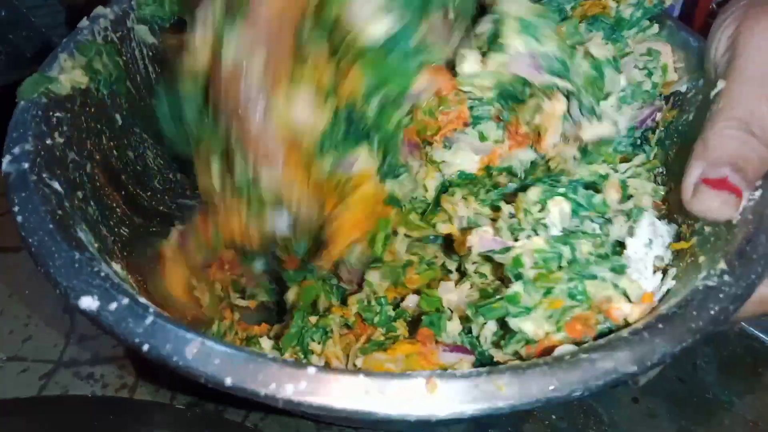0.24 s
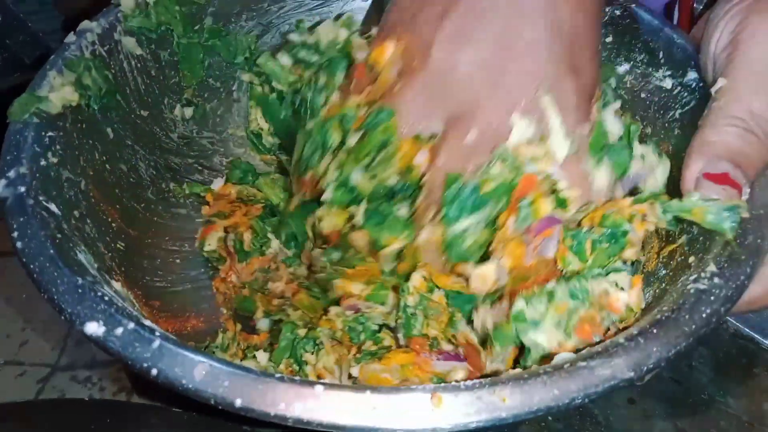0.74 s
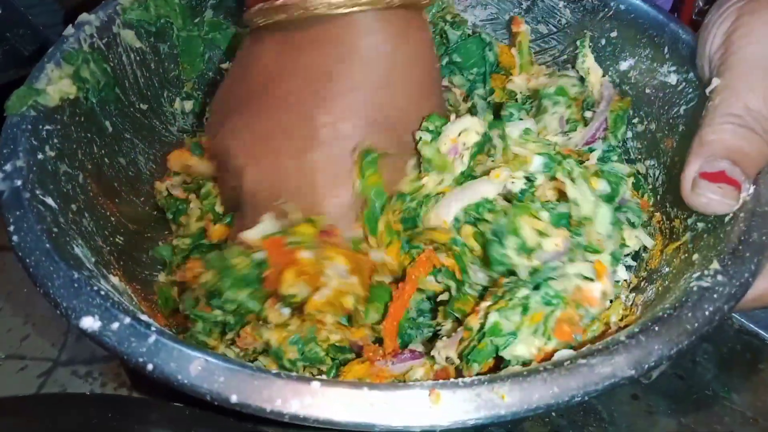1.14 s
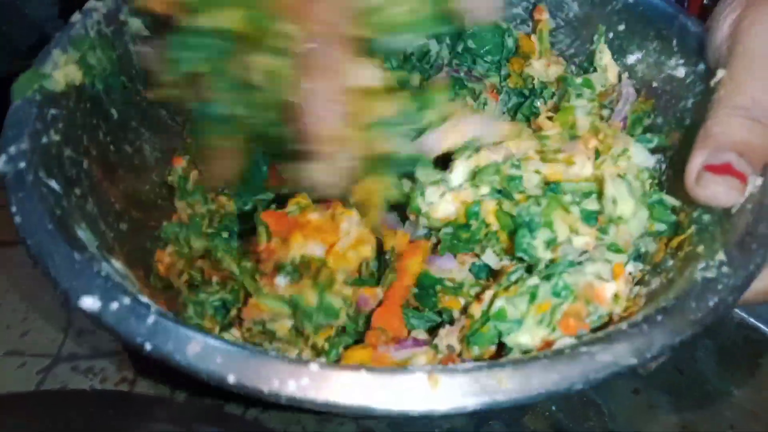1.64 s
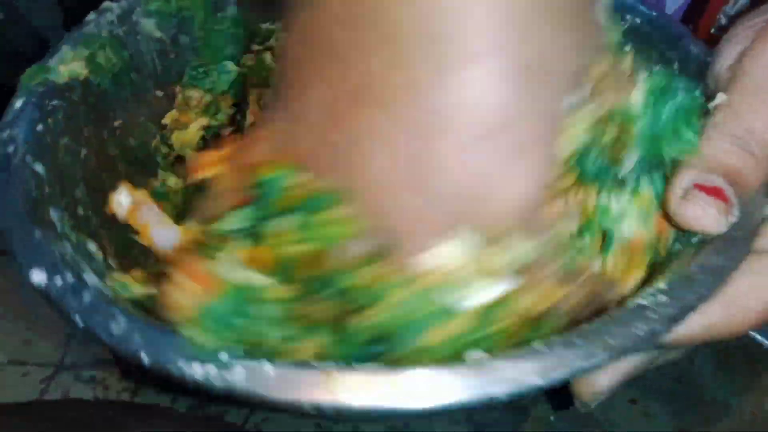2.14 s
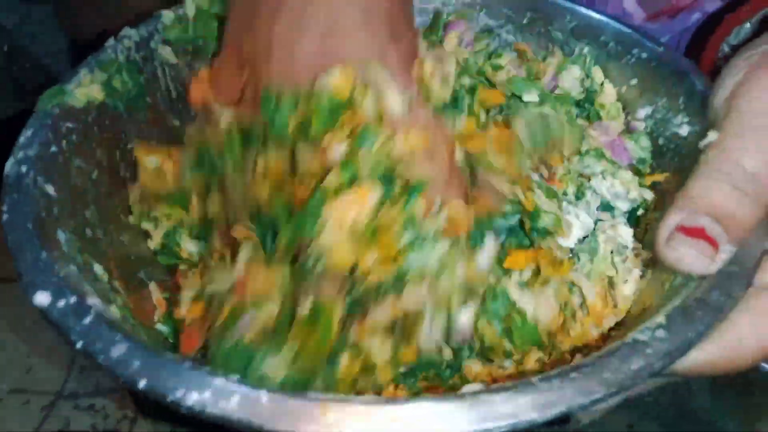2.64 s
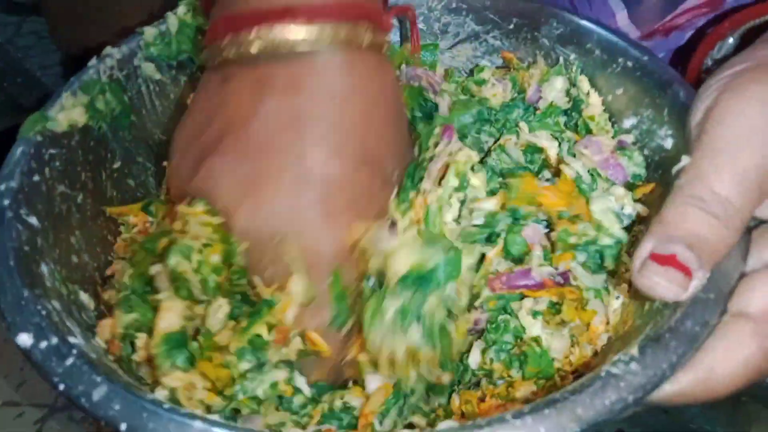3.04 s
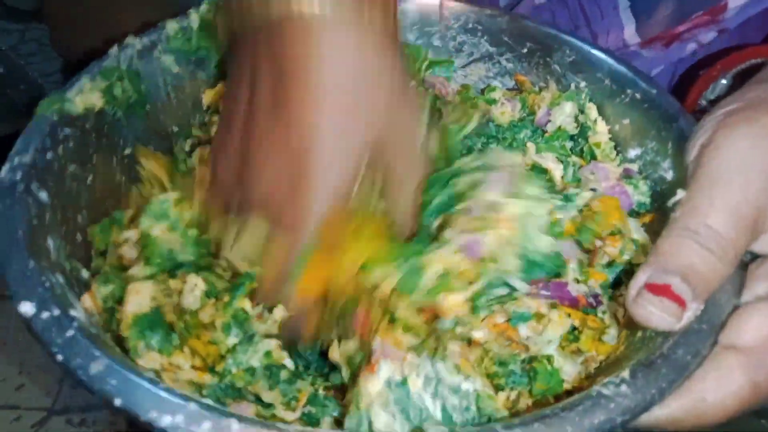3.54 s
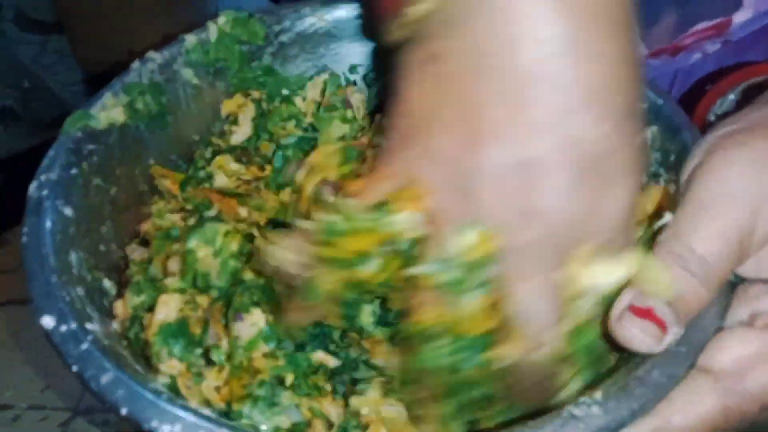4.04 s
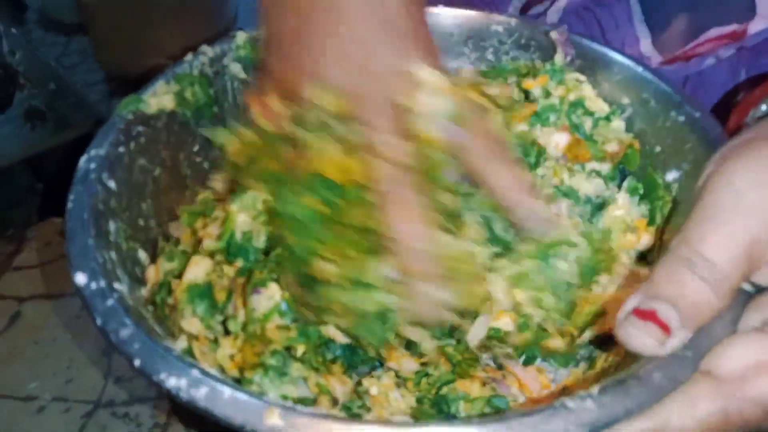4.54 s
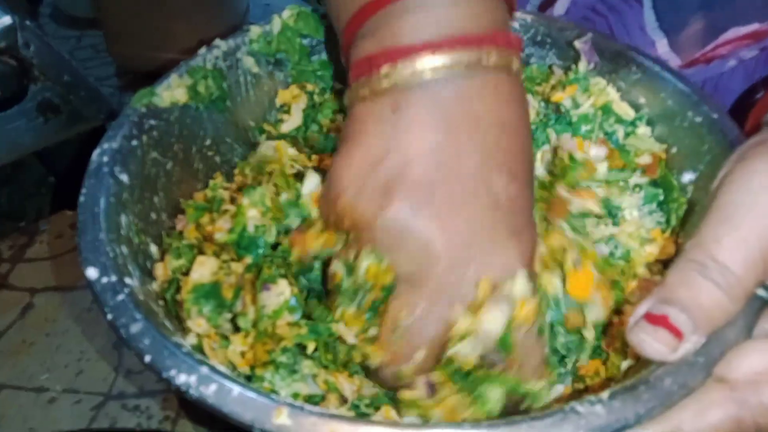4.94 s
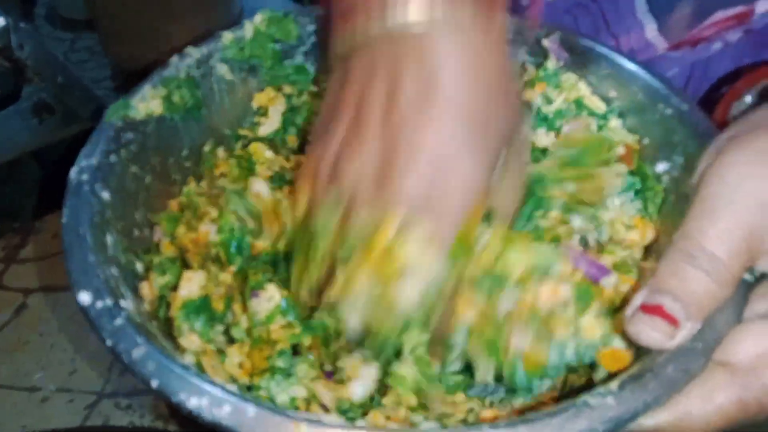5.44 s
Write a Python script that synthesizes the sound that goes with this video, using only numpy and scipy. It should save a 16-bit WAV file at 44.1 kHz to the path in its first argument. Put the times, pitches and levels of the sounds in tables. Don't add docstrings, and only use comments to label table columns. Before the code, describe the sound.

A hand squelches and crunches through a stiff, wet chopped mixture in a steel bowl that knocks dully on a stone floor.

```python
import sys
import numpy as np
from scipy import signal
from scipy.fft import rfft, irfft
from scipy.io import wavfile
from scipy.ndimage import uniform_filter1d, minimum_filter1d

SR = 44100
rng = np.random.default_rng(int(sys.argv[2]) if len(sys.argv) > 2 else 0)


def store_pcm(level_fs):
    pcm = np.round(np.clip(level_fs, -1, 1) * 32767).astype(np.int16)
    wavfile.write(sys.argv[1], SR, np.atleast_2d(pcm).T)


def invert_db(x):
    u = np.asarray(x, float) / 20
    return 10 ** u


N = 250929
TIME = np.arange(N) / SR

# (frequency [Hz], level [dB], t60 [s])
BOWL_MODES = [(549, -27, 0.009), (660, -4.5, 0.006), (731, -13.5, 0.066), (920, 1, 0.0098),
              (1190, 6, 0.041), (1252, -1, 0.056), (1500, 11.5, 0.023), (1630, 15, 0.014),
              (1910, 0, 0.0053), (2134, 10.5, 0.022), (2460, -24, 0.011), (2742, -16, 0.017)]
# (frequency [Hz], level per Hz [dB])
SQUELCH_COLOUR = [(88, -54), (150, -16.5), (468, -15), (804, 4.5), (968, -0.5), (1550, -4), (2000, -6.5),
                  (2440, -5.5), (3740, -7.5), (4500, -24), (5850, -57), (9900, -120)]
# (frequency [Hz], level per Hz [dB])
CRACKLE_COLOUR = [(3000, 9), (4000, 1.5), (4500, -7.5), (5600, -6.5), (6800, -1), (7500, 0.5), (8150, 4),
                  (8700, -1.5), (9400, -3.5), (9700, -11), (11500, -11.5), (11900, -15), (13000, -23),
                  (13400, -20), (14800, -13.5), (15600, -15.5)]
BAND_EDGES_HZ = [250, 1100, 3800, 9500, 16400]


def rms_one(x):
    return x / np.sqrt(np.mean(x ** 2) + 1e-20)


def peak_one(x):
    return x / np.max(np.abs(x))


def at_hz(points, hz):
    curve = np.array(points)
    return np.interp(np.log(np.maximum(hz, 1)), np.log(curve[:, 0]), curve[:, 1])


def colour(x, spectrum):
    size = 2 ** 11
    level_db = at_hz(spectrum, np.linspace(0, SR / 2, size // 2 + 1))
    cepstrum = irfft(np.log(invert_db(level_db)))
    cepstrum[1:size // 2] *= 2
    cepstrum[size // 2 + 1:] = 0
    return signal.oaconvolve(x, irfft(np.exp(rfft(cepstrum))))[:len(x)]


def band(x, low_hz, high_hz):
    return signal.sosfilt(signal.butter(2, [low_hz, high_hz], "band", fs=SR, output="sos"), x + 1e-18)


def drift(rate):
    r = np.exp(-80 * np.pi * rate / SR)
    slow = signal.lfilter([1], [1, -2 * r, r * r], rng.standard_normal(N // 40 + 2002))[2000:]
    return np.interp(np.arange(N) / 40, np.arange(len(slow)), rms_one(slow))


def add(out, s, piece):
    at = max(round(s * SR), 0)
    out[at:at + len(piece)] += piece[:len(out) - at]


def swells(s, db, width):
    coarse = TIME[::64]
    bells = np.exp(-((coarse - s[:, None]) / width[:, None]) ** 2)
    return np.interp(TIME, coarse, np.sum(invert_db(db)[:, None] * bells, axis=0))


def patchy(x, low_hz, high_hz, patch_db):
    edges = np.geomspace(low_hz, high_hz, 4)
    out = 0
    for k, (low, high) in enumerate(zip(edges, edges[1:])):
        out = out + invert_db(patch_db * drift(9)) * band(x, low, high) * (-1) ** k
    return out


def hand():
    # (time [s], pressure as wet smack [dB], crispness of what it crushes [dB])
    presses = [(0, -39.5, -13), (.33, -67.5, -1.5), (.54, -66.5, -0.5), (.65, -52, -14.5),
               (1.1, -43, -11.5), (1.3, -55, -3), (1.58, -56, -7.5), (1.76, -66.5, -4), (2.0, -57, -1),
               (2.55, -61.5, -3), (2.97, -43, -9.5), (3.3, -49, -4.5), (3.62, -53, -19), (3.9, -60.5, -7),
               (4.6, -64, -5.5), (4.9, -42.5, -4), (5.2, -46.5, -7.5), (5.69, -62, -5.5)]
    # (middle [s], smack [dB], width [s], hollow
    # part [dB])
    squelches = [(.17, -56, 0.07, -4), (.82, -78, 0.01, 28), (5.096, -48.5, 0.034, -4),
                 (.43, -73.5, 0.091, 15), (.67, -47.5, 0.033, 6), (.96, -42, 0.033, -14),
                 (1.53, -48.5, .06, -16), (5.46, -50, 0.047, -22), (1.37, -70.5, 0.036, 23.5),
                 (1.884, -46.5, 0.066, 4), (2.193, -50, 0.14, -1.5), (2.437, -49.5, 0.04, -3),
                 (2.72, -83, 0.15, 19), (4.088, -53, 0.086, 0), (4.366, -50.5, 0.038, -6),
                 (4.78, -67.5, 0.15, 15.5), (5.31, -48, 0.012, -2), (5.48, -62, 0.029, -15)]
    # (middle [s], level [dB], width [s])
    drags = [
        (.5, -76, 0.3),
        (1.86, -58.5, 0.088),
        (2.8, -62.5, 0.14),
        (4.6, -72, 0.12),
        (5.69, -71.5, 0.35),
    ]
    s, *columns = np.transpose(presses)
    press_db, crisp_db = (np.interp(TIME, s, column) for column in columns)
    s, db, width, hollow_db = np.transpose(squelches)
    hollow = invert_db(-55.5 + 0.76 * (press_db + 51.5)) + swells(s, db + hollow_db, width)
    smack = invert_db(press_db) + swells(s, db, width)
    crackle = invert_db(press_db + crisp_db)
    fizz = invert_db(-65.5 + 0.78 * (press_db + crisp_db + 60.5))
    drag = invert_db(-72.5 + 0.13 * (press_db + 48)) + swells(*np.transpose(drags))
    return hollow, smack, crackle, fizz, drag


def ring_bowl(x):
    out = 0
    for hz, db, t60 in BOWL_MODES:
        r, w = invert_db(-60 / (t60 * SR)), 2 * np.pi * hz / SR
        out = out + signal.lfilter([0, invert_db(db) * np.sin(w)], [1, -2 * r * np.cos(w), r * r], x)
    return out


def mixture():
    out, clumps = np.zeros(N), drift(35)
    colours = (SQUELCH_COLOUR, SQUELCH_COLOUR, CRACKLE_COLOUR, CRACKLE_COLOUR)
    bursts_per_s, burst_db = (285, 607, 1100, 1500), (-2.0, -3.0, -10.0, -11.0)
    bowl_levels_db = (-5, -5, None, None)
    layers = zip(BAND_EDGES_HZ, BAND_EDGES_HZ[1:], hand(), colours, bursts_per_s, burst_db, bowl_levels_db)
    for low_hz, high_hz, gain, spectrum, per_s, grain_db, bowl_db in layers:
        born = rng.random(N) < per_s * invert_db(3 * clumps + 3 * drift(30)) / SR
        sizes = invert_db(3 * np.minimum(rng.exponential(1, N), 5))
        bursts = born * sizes * rng.choice([-1, 1], N)
        friction = rng.standard_normal(N) * invert_db(1.5 * clumps + 2.2 * drift(22.6))
        raw = invert_db(grain_db) * rms_one(bursts) + friction
        wet = rms_one(colour(raw, spectrum))
        if bowl_db is not None:
            wet = wet + invert_db(bowl_db) * rms_one(ring_bowl(raw))
        uneven = patchy(wet, low_hz, high_hz, patch_db=3.0)
        out += gain * rms_one(band(uneven, low_hz * 0.72, high_hz * 1.32))
    return out


def rumble():
    # (frequency [Hz], level per Hz [dB])
    drag_colour = [(15, -26), (25, -1.5), (195, 3.5), (240, -3), (300, 3.5), (350, -8.5), (460, -1),
                   (770, -120)]
    return hand()[-1] * invert_db(0.99 * drift(3.2)) * rms_one(colour(rng.standard_normal(N), drag_colour))


def kitchen_air():
    hiss = band(colour(rng.standard_normal(N), CRACKLE_COLOUR), 8000, 16000)
    hum = colour(rng.standard_normal(N), SQUELCH_COLOUR)
    return invert_db(-67) * rms_one(hiss) + invert_db(-69.5) * rms_one(hum)


def pops():
    # (time [s], peak [dB], pitch [Hz])
    pockets = [(0.022, -31, 1710), (0.031, -22.5, 1910), (0.066, -35, 1650), (0.247, -41, 2400),
               (0.722, -35, 2500), (0.835, -33.5, 696), (0.88, -51, 1510), (1.046, -25.5, 780),
               (1.419, -34, 856), (1.692, -40, 845), (1.93, -21.5, 1220), (2.145, -35, 1270),
               (2.157, -23.5, 1220), (2.999, -30.5, 1870), (3.031, -25.5, 1630), (3.133, -33, 1690),
               (3.153, -38, 2030), (3.228, -28, 1660), (3.244, -26, 830), (3.292, -13, 797),
               (3.374, -37, 890), (3.416, -29, 1500), (3.555, -27.5, 1450), (4.353, -31.5, 820),
               (5.125, -35, 1560), (5.215, -28, 1500), (5.274, -3.5, 847), (5.314, -22, 830)]
    out, t = np.zeros(N), np.arange(round(0.059 * SR)) / SR
    spread, t60_s = 2 ** 0.67, 0.036
    for s, db, hz in pockets:
        noise = rng.standard_normal(len(t))
        burst = rms_one(band(band(noise, hz / spread, hz * spread), hz / 2, hz * 2))
        fade = invert_db(db - 9 - 60 * t / t60_s) * (1 - np.exp(-t / 0.00031))
        add(out, s - .001, fade * burst)
    return out


def ticks():
    # (time [s], peak [dB], lower edge [dB], t60 [s])
    bangles = [(0.114, -37, 18, 0.015), (0.4104, -42.5, 6.5, 0.047), (0.508, -37, 0, 0.06),
               (0.5465, -29, -18, 0.022), (0.9064, -13, -7, 0.048), (1.009, -31.5, -1, 0.03),
               (1.1383, -43, -6, .016), (1.2105, -45, -16, .024), (1.284, -20, 2, 0.045),
               (1.4469, -24.5, 3, 0.057), (1.845, -28.5, -18, 0.05), (1.9, -51, -16, .042),
               (2.2026, -21.5, -30, 0.053), (2.7275, -27, -4, 0.087), (2.9186, -32, 4, 0.033),
               (3.115, -44, -15, 0.021), (3.195, -39, -18, .03), (3.5544, -20.5, -14, 0.022),
               (3.594, -25, 3, 0.074), (3.7743, -41.5, -21, 0.024), (4.5813, -38.5, -14, 0.041),
               (4.666, -11, -1.5, 0.023), (4.818, -20.5, -35, 0.089), (4.858, -29, 0, 0.073),
               (4.9365, -12, 0.5, 0.014), (5.0273, -30, 0, 0.056), (5.0556, -31, -12, .024),
               (5.265, -34.5, -3, 0.13), (5.4075, -18.5, 7.5, 0.05), (5.5395, -38.5, -5, 0.096)]
    # (time [s], peak [dB])
    leaf_snaps = [(0.283, -50), (0.3526, -44), (0.8729, -47), (1.0645, -45), (1.0934, -47), (1.158, -32),
                  (1.2381, -36), (1.6132, -44), (2.3491, -60), (2.4309, -47), (2.5306, -46), (2.6938, -42),
                  (2.8908, -43), (3.033, -37), (3.141, -34), (3.3493, -38), (3.497, -46), (3.5104, -45),
                  (3.5285, -43), (3.6825, -46), (3.8676, -50), (4.4645, -38.5), (4.787, -44), (4.9155, -24),
                  (5.103, -28.5), (5.2046, -41), (5.235, -40), (5.3144, -44), (5.475, -27.5), (5.5079, -37),
                  (5.5664, -36)]
    snap_edge_db, snap_t60_s = -12, 0.016
    fine_db, fine_t60_s = -10, 0.063
    out, t = np.zeros(N), np.arange(round(.1 * SR)) / SR
    for s, db, edge_db, t60 in bangles + [(s, db, snap_edge_db, snap_t60_s) for s, db in leaf_snaps]:
        crack = colour(rng.standard_normal(len(t)), CRACKLE_COLOUR)
        edge = rms_one(band(crack, 3000, 5500))
        body = rms_one(band(crack, 5600, 9500))
        fine = rms_one(band(crack, 9600, 17000))
        fade = invert_db(-60 * t / max(t60, .004)) * (1 - np.exp(-t / 0.00045))
        shares = invert_db(edge_db) * edge + body + invert_db(fine_db - 60 * t / fine_t60_s) * fine
        add(out, s - .001, invert_db(db - 7.5) * fade * shares)
    return out


def knocks():
    # (time [s], peak [dB], pitch of the thud [Hz], hollow part [dB], hard part [dB])
    firm_knocks = [(0.333, -18, 750, -20, -37.5), (.41, -20.5, 724, -9.5, -10),
                   (.509, -19.5, 1250, -9, -16.5), (0.585, -24, 1530, -3.5, -9.5),
                   (.905, -3.5, 1500, -6, 0), (.984, -26, 850, -1.5, -2), (1.283, -1, 882, -5, -15.5),
                   (1.446, -11.5, 2370, -1, 4), (2.201, -3, 840, -4, -3.5), (2.727, -2.5, 773, -5, -7),
                   (2.732, -10.5, 974, -6, -11), (2.863, -18, 607, -5.5, -23), (2.887, -16.5, 734, -8, -27),
                   (2.917, -16.5, 825, -1, -12), (3.283, -8.5, 786, 4, -9), (3.593, -6.5, 1980, -6, -2.5),
                   (3.6, -6.5, 1630, 2.5, -3), (4.662, -2, 787, -12, -11), (4.816, -19, 863, -17, -11.5),
                   (4.859, -14, 2880, -15.5, -9.5), (4.914, -5, 756, -20, -23),
                   (4.935, -13.5, 1600, -0.5, -7.5), (5.273, -10.5, 875, 1.5, -3.5),
                   (5.409, -6, 1410, -5, -2.5)]
    # (time [s], peak [dB], pitch of the thud [Hz], share of the steel [dB])
    light_bumps = [(.114, -28.5, 810, -26), (.625, -27.5, 1450, -29), (.14, -30.5, 800, -17),
                   (0.77, -36, 756, -20), (.944, -15.5, 1500, -34), (1.113, -34, 1440, -24),
                   (1.157, -30.5, 2800, -30), (1.755, -50, 786, 5), (1.798, -58, 867, -9),
                   (1.843, -35, 810, -5), (1.855, -24.5, 810, -21), (1.871, -18, 797, -9),
                   (1.881, -19.5, 820, -20), (1.897, -22.5, 810, -7), (1.911, -23, 1190, -35),
                   (2.348, -27, 797, -26), (2.44, -43, 705, -19), (2.53, -25.5, 790, -15),
                   (2.603, -35.5, 650, -12), (3.078, -34.5, 940, -15), (3.39, -29.5, 830, -15),
                   (3.415, -58, 1500, -14), (3.889, -41, 686, -16), (4.369, -26.5, 786, -33),
                   (4.575, -33.5, 730, -11), (4.85, -22, 880, -3), (5.027, -28, 2700, -37),
                   (5.044, -31, 2400, -29), (5.085, -29.5, 880, -21), (5.269, -17, 820, -0.5)]
    # (frequency [Hz], level per Hz [dB])
    bowl_colour = [(18, -74), (30, -66), (229, -45), (400, -10.5), (455, -21), (654, -4), (846, 1),
                   (1270, -6), (1510, -7), (1830, -8.5), (2200, -3), (2800, -10.5), (4300, -36),
                   (5000, -31.5), (6500, -40.5), (11000, -120)]
    out, t = np.zeros(N), np.arange(round(.18 * SR)) / SR
    mode_hz, mode_db, mode_t60 = np.array(BOWL_MODES).T[:, :, None]
    blows = list(firm_knocks)
    for s, db, hz, steel_db in light_bumps:
        blows.append((s, db, hz, steel_db, steel_db - 1.5 + 6 * np.log2(hz / 1000)))
    for s, db, hz, hollow_db, hard_db in blows:
        octaves, loudest_db = np.log2(hz / 1000), max(hollow_db, hard_db)
        noise = rng.standard_normal((2, len(t)))

        brief = t * max(hz / 900, 1) ** 1.1
        thud = peak_one(brief ** 2 * np.exp(-brief / .0012)) * np.sin(2 * np.pi * hz * t)

        strengths_db = rng.normal(0, 1.54, mode_db.shape)
        retuned_hz = mode_hz * (1 + .035 * noise[1, :len(BOWL_MODES), None])
        part_db = np.where(mode_hz < BAND_EDGES_HZ[1], hollow_db, hard_db)
        rings = invert_db(part_db + mode_db + strengths_db - 60 * t / mode_t60) * np.sin(2 * np.pi * retuned_hz * t)
        ring = invert_db(-14.5) * rings.sum(axis=0) * (1 - np.exp(-t / 0.0006))

        slide = 1 + .05 * np.tanh(noise[1, -1])
        rough = colour(noise[0], np.array(bowl_colour) * [slide, 1])
        hollow = rms_one(band(band(rough, 37, 1810), 33, 1590))
        hard = rms_one(band(rough, 1206, 7300))
        tinted = invert_db(hollow_db) * hollow + invert_db(hard_db) * hard
        push = peak_one((t / .0012) ** 2 * np.exp(-t / 0.0013))
        contact = invert_db(-3) * push * tinted

        thump_db = 0.33 * hollow_db - 22.5 - 15.6 * octaves - 60 * t / 0.071
        thump = invert_db(thump_db) * rms_one(band(noise[1], 265, 880)) * (1 - np.exp(-t / 0.019))

        hum = invert_db(loudest_db - 10) * rms_one(band(noise[0], hz * .7, hz * 1.45))
        lumps = invert_db(3.4 * rms_one(band(noise[1], 32, 263)))
        rattle_db = -19.5 - 0.1 * db + 7.5 * octaves - loudest_db
        rattle = invert_db(rattle_db - 60 * t / 0.11) * lumps * (1 - np.exp(-t / 0.0048))

        blow = invert_db(-3.5) * band(thud, hz / 4, hz * 2) + ring + contact + thump + (tinted + hum) * rattle
        add(out, s, invert_db(db) * blow)
    return band(band(out, 160, 19000), 160, 19000)


def swishes():
    # (middle [s], level [dB], width [s], finest treble [dB])
    brushes = [(.30, -58, 0.023, -16), (.70, -54.5, 0.064, -6), (1.21, -57.5, 0.014, 5.5),
               (1.62, -54, 0.026, -59), (1.90, -46, 0.062, -1), (2.43, -52.5, 0.029, -5),
               (3.53, -53, 0.034, 0), (4.05, -57, 0.14, -7), (4.17, -62, 0.037, -10),
               (4.359, -51.5, 0.049, -10), (4.61, -59.5, 0.042, 1), (5.14, -61.5, 0.08, 7.5),
               (5.57, -61.5, 0.054, 10.5)]
    rustle = colour(rng.standard_normal(N), CRACKLE_COLOUR)
    body, fine = rms_one(band(rustle, 5160, 11900)), rms_one(band(rustle, 9870, 17400))
    s, db, width, fine_db = np.transpose(brushes)
    return swells(s, db, width) * body + swells(s, db + fine_db, width) * fine


def room(x):
    # (frequency [Hz], t60 [s])
    decay = [(200, 0.11), (800, 0.14), (2200, 0.2), (5000, 0.21), (12000, 0.035)]
    t, echoes = np.arange(round(.3 * SR)) / SR, 0
    for low in 100 * 2 ** np.arange(0, 7.5):
        noise = band(rng.standard_normal(len(t)), low, min(2 * low, 19000))
        echoes = echoes + noise * invert_db(-60 * t / at_hz(decay, low * 1.2))
    spectrum = rfft(echoes)
    narrow, broad = (uniform_filter1d(np.abs(spectrum) ** 2, size) for size in (24, 300))
    echoes = irfft(spectrum * np.sqrt(broad / narrow), len(t))
    echoes = echoes * (t > .005) * (t < .27)
    return signal.oaconvolve(x, echoes / np.sqrt(np.sum(echoes ** 2)))[:N]


def scene():
    # (frequency [Hz], side minus mid [dB])
    width = [(60, -56.5), (400, -76.5), (3300, -64), (4100, -19.5), (5500, -11.5), (6500, -36.5),
             (9000, -23), (10500, -12), (12200, -4.5), (15000, 2.5)]
    thuds, cracks = knocks() + pops(), ticks()
    bed = mixture() + rumble() + swishes() + kitchen_air()
    place = (TIME / .17).astype(int) % 4
    echoes = sum(room((thuds + cracks) * (place == k)) for k in range(4))
    mid = thuds + cracks + bed + invert_db(-12) * echoes
    late_cracks = colour(np.roll(cracks, 31), [(3300, -60), (4400, 0), (8000, 0), (11000, -12)])
    side = colour(room(bed), width) + invert_db(-10) * late_cracks
    return np.array([mid + side, mid - side])


def level_of(x):
    return 10 * np.log10(uniform_filter1d(x ** 2, round(0.0095 * SR)) + 1e-12)


def low_pass(x):
    return signal.sosfilt(signal.butter(12, 16480, fs=SR, output="sos"), x)


def record(dry):
    mono, ahead = dry.mean(axis=0), round(.005 * SR)

    treble_db = level_of(band(mono, 2400, 21000))
    fade_in = 1100 * TIME
    crack_db = np.maximum.accumulate((treble_db - fade_in)[::-1])[::-1] + fade_in
    still_to_come = np.clip((crack_db - treble_db - 3.5) / 8, 0, 1)
    duck_db = 0.52 * np.clip(crack_db + 42.5, 0, 20) * still_to_come

    coming_db = -minimum_filter1d(-level_of(mono), ahead, origin=-(ahead // 2))
    release = 45 * TIME
    held_db = np.maximum.accumulate(0.25 * np.maximum(coming_db + 27, 0) + release) - release
    gain = invert_db(2.5 - uniform_filter1d(held_db + duck_db, round(0.00063 * SR)))

    after_db = 0.77 * np.roll(uniform_filter1d(held_db, round(0.025 * SR)), round(0.04 * SR))
    fine = signal.sosfiltfilt(signal.butter(4, 9600, "high", fs=SR, output="sos"), dry)
    dry = dry - (1 - invert_db(-after_db)) * fine

    rounded = .8 * np.tanh(dry * gain / .8)
    treble_limit = signal.ellip(12, .3, 32, 15820, fs=SR, output="sos")
    finished = band(signal.sosfilt(treble_limit, rounded), 94, 19000)
    return low_pass(finished)


dry = scene()
out = record(dry)
store_pcm(out)
```